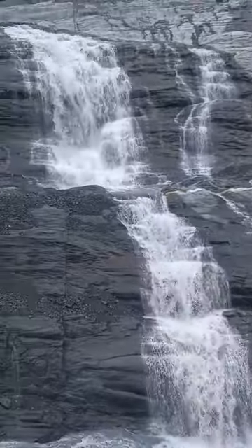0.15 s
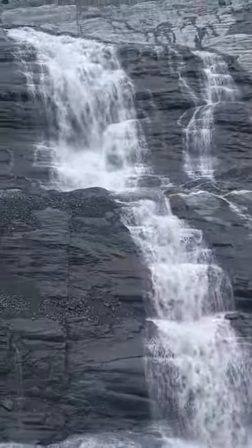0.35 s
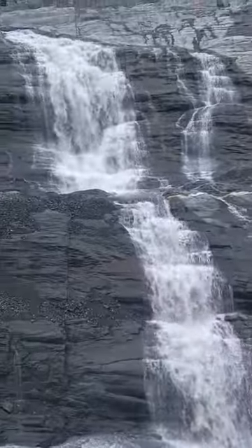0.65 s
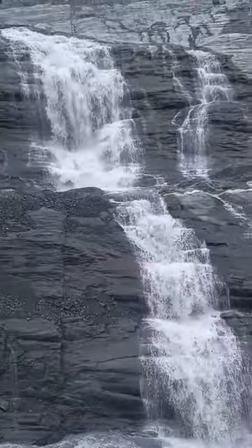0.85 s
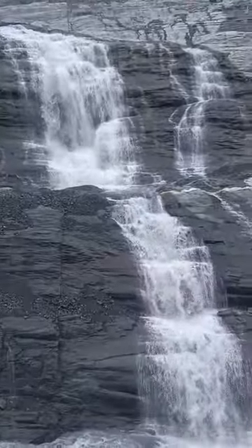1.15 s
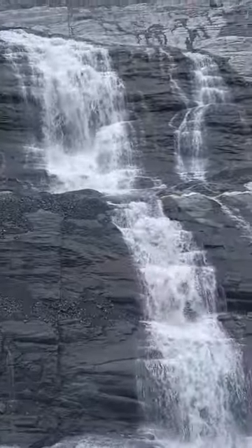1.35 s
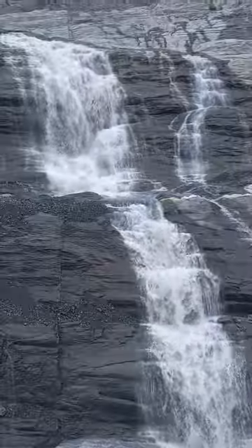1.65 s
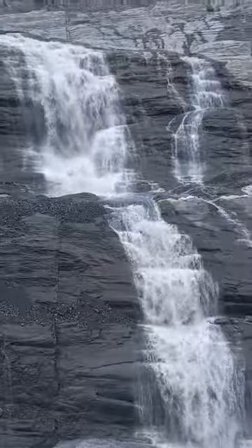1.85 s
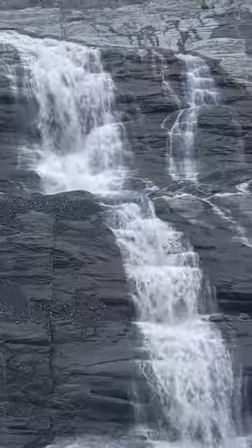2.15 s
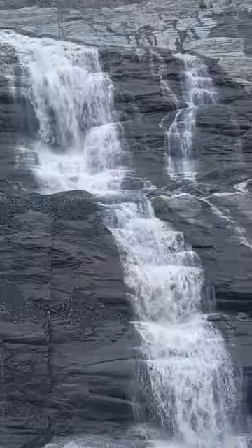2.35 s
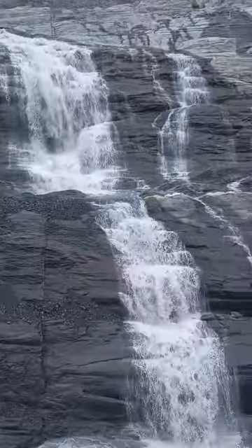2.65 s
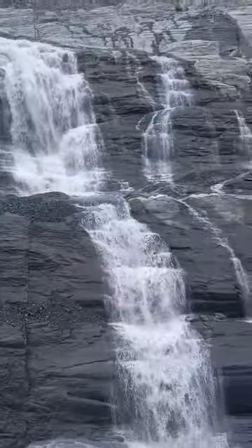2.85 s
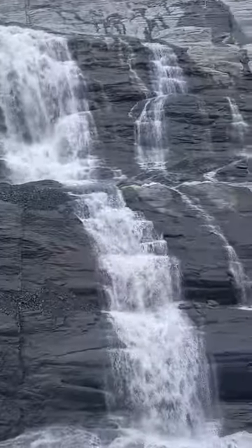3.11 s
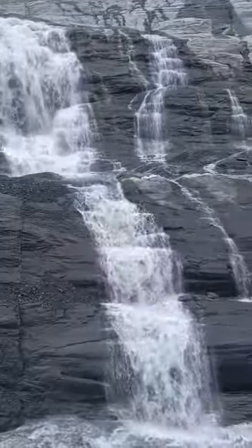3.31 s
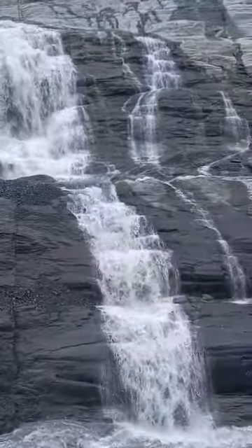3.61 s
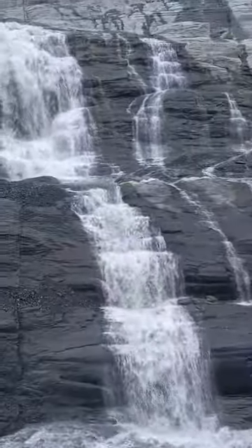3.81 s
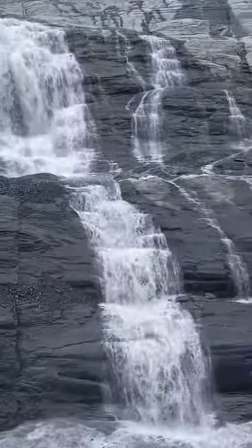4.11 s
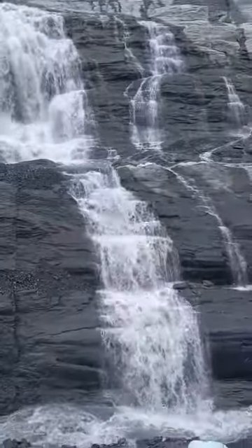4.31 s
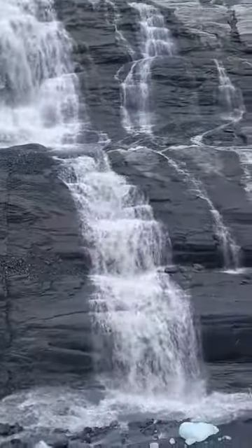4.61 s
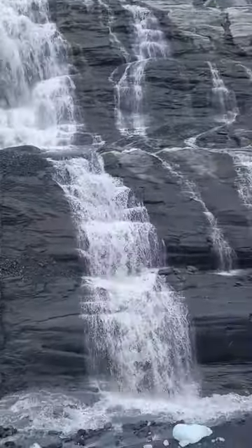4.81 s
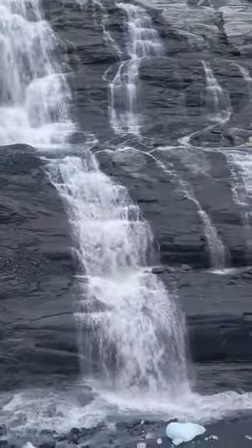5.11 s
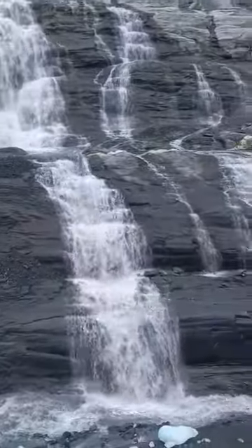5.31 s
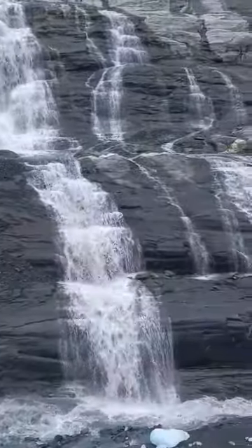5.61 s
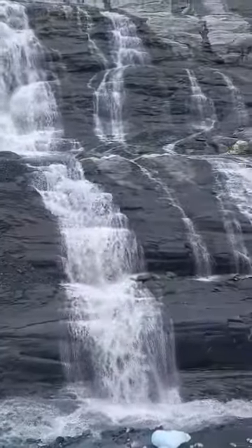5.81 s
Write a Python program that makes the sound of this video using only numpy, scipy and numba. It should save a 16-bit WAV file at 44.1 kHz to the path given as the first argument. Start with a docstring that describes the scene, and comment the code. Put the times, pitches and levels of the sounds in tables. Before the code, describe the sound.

Outdoors in a rocky mountain valley, a cascade of meltwater rushes over stone ledges with dense hiss, slapping drops and bubbling splashes. A hand-held phone catches soft low wind thumps from the start, mostly left. After half a second, ragged crackle and sharp snaps appear, strongest on the right. The rush sags around two and a half seconds, recovers near four, and changes tone as the phone turns.

```python
"""A meltwater cascade pours down rock ledges: spray hisses, drops slap the stone and bubbles ring in the pools.
From the start wind buffets the two microphone ports of a hand-held phone, and the middle band swells briefly.
After half a second the wind also sputters and cracks, most on the right port. The rush dips briefly again and again
and sags midway. Then its colour changes as the phone turns, and a low, hollow double tone sounds near 4.1 s.
Water is filtered noise, random ticks and damped sines; wind is filtered noise and ticks under timed envelopes."""
import sys
import numpy as np
from scipy import signal
from scipy.fft import rfft, irfft
from scipy.io import wavfile
from scipy.ndimage import uniform_filter1d
from numba import njit

SR = 44100
rng = np.random.default_rng(int(sys.argv[2]) if len(sys.argv) > 2 else 0)


def persist_wave(psi):
    """Save psi, clipped to +-1, as 16-bit WAV."""
    counts = np.round(np.clip(psi, -1, 1) * 32767).astype(np.int16)
    wavfile.write(sys.argv[1], SR, np.atleast_2d(counts).T)


N = 262836  # length of the scene [samples]

# colour of wind crackle, shared by the sputter and the cracks: (frequency [Hz], relative level [dB per Hz])
CRACKLE_COLOUR = [(120, -45), (250, -36), (350, -6.5), (550, -2.5), (850, -2.5), (1200, 1.5), (1600, -1.5),
                  (2300, -12.5), (3500, -12.5), (7000, -31)]


def undb(db):
    """Turn decibels into a gain."""
    return 10 ** (np.asarray(db) / 20)


def unit(x):
    """Scale to an average strength (rms) of 1."""
    return x / np.sqrt(np.mean(x ** 2))


def curve(rows):
    """Join (time [s], value) rows by straight lines."""
    return np.interp(np.arange(N) / SR, *np.transpose(rows))


def over_bins(rows):
    """Read (frequency [Hz], value) rows at every frequency bin, on a log axis."""
    hz, value = np.transpose(rows)
    bin_hz = np.maximum(np.fft.rfftfreq(N, 1 / SR), 1)
    return np.interp(np.log(bin_hz), np.log(hz), value)


def colour(x, rows):
    """Filter by (frequency [Hz], gain [dB]) rows."""
    return irfft(rfft(x) * undb(over_bins(rows)), N)


def walk(rate):
    """Wander at random: new levels, rate times a second, smoothed twice and scaled to rms 1."""
    k = max(int(SR / rate), 2)
    held = np.repeat(rng.standard_normal(N // k + 1), k)[:N]
    return unit(uniform_filter1d(uniform_filter1d(held, k), k))


def impacts(per_s, spread_db):
    """Randomly timed ticks of either sign and of uneven strength."""
    hit = rng.random(N) < per_s / SR
    sign = rng.choice([-1, 1], N)
    return unit(hit * sign * undb(spread_db * rng.random(N)))


def pulse(start, length, rise, fall):
    """Envelope 0-1, times in seconds: rise at the start, hold, fall once the length is over."""
    t = np.arange(N) / SR - start
    return np.clip(t / rise, 0, 1) * np.clip(1 - (t - length) / fall, 0, 1)


def steady(x, size):
    """Even out chance swells longer than size samples, keeping roughly the mean level."""
    power = np.mean(np.atleast_2d(x) ** 2, axis=0)
    local_power = uniform_filter1d(power, size) + 1e-18  # never zero
    return x * np.sqrt(power.mean() / local_power)


@njit
def ring(start, hz, cycles, size, glide):
    """Add up damped sines whose pitch climbs, as a bubble's does when it nears the surface."""
    out = np.zeros(N)
    for k in range(len(start)):
        length, phase = int(cycles[k] * SR / hz[k]), 0.
        for i in range(min(length, N - start[k])):
            age = i / length
            phase += 2 * np.pi * hz[k] * (1 + glide * age) / SR
            out[start[k] + i] += size[k] * np.exp(-5 * age) * np.sin(phase)
    return out


def random_rings(count, low_hz, high_hz, cycles, spread_db, glide):
    """Short ringing tones at random times and pitches, like air bubbles of all sizes."""
    when, pitch, life, size = rng.random((count, 4)).T
    start = (when * N).astype(np.int64)
    hz = low_hz * (high_hz / low_hz) ** pitch
    # high-pitched tones are brief but sharp; a few of any pitch are much stronger
    gain = undb(-spread_db * np.log(np.maximum(size, .01))) * hz / low_hz
    return unit(ring(start, hz, cycles * (.5 + life), gain, glide))


def spray(flicker_db, flicker_rate):
    """Sheets of water tear into spray: each third of an octave of the hiss flickers by itself."""
    noise = rfft(rng.standard_normal(N))
    # the lowest and highest bands take in everything beyond 400 and 12000 Hz
    band = np.floor(3 * np.log2(np.clip(np.fft.rfftfreq(N, 1 / SR), 400, 12000)))
    out = 0
    for k in np.unique(band):
        out = out + irfft(noise * (band == k), N) * undb(flicker_db * walk(flicker_rate))
    return unit(out)


def ledge(drops_db=-11, bubbles_db=-8):
    """Water lands on one ledge: spray, with drops slapping the rock and bubbles ringing in the same clumps."""
    drops = impacts(per_s=5000, spread_db=12)
    bubbles = random_rings(count=6000, low_hz=643.4, high_hz=3194, cycles=28.2, spread_db=1.25, glide=0.14)
    clumps = unit(undb(4 * np.tanh(walk(120))))
    splashing = clumps * (undb(drops_db) * drops + undb(bubbles_db) * bubbles)
    return unit(spray(flicker_db=2.5, flicker_rate=110) + splashing)


def at_ports(ledges, rows, lag_ms):
    """One ledge reaches both ports alike, the left a little later; the others reach one port each."""
    shared, left, right = ledges
    rows = np.array(rows)
    alike = over_bins(rows[:, ::2])
    late = np.exp(-2j * np.pi * np.fft.rfftfreq(N, 1 / SR) * lag_ms / 1000)
    together = np.array([shared * late, shared])
    apart = np.array([left, right])
    ports = np.sqrt(alike) * together + np.sqrt(1 - alike) * apart
    return unit(colour(irfft(ports, N), rows[:, :2]))


def steady_flow(rush):
    """The flow is constant, so the splashing and the hiss above it are each evened out."""
    splash = irfft(rfft(rush) * (np.fft.rfftfreq(N, 1 / SR) < 2800), N)
    return steady(splash, size=1700) + steady(rush - splash, size=1700)


def rush_level():
    """Level in dB: a slow curve that sags midway, with brief dips cut into it and a slight random flutter."""
    # slow course of the rush, before the overall level is added: (time [s], level [dB])
    slow_course = [(0, -24), (0.25, -23), (0.6, -26.5), (0.86, -24), (1.24, -23.5), (1.4, -25), (1.56, -23),
                   (2.0, -32), (2.45, -35.5), (2.82, -32), (2.96, -28.5), (3.3, -28), (3.65, -26),
                   (3.85, -23.5), (4.55, -23.5), (4.9, -24.5), (5.4, -23), (5.96, -24)]
    # the rush dips briefly on both ports: (start [s], length [s], depth [dB])
    brief_dips = [(0.369, 0.056, 2.5), (0.496, .14, 5), (0.751, 0.081, 4), (0.996, 0.079, 2.5),
                  (1.06, 0.05, 4), (1.273, 0.056, 1), (1.594, 0.092, 2.5), (1.708, 0.054, 4.5),
                  (1.81, 0.028, 3.5), (1.91, 0.06, 2.5), (2.248, 0.017, 2), (2.677, 0.015, 2),
                  (2.386, 0.044, 4.5), (2.747, 0.13, 3.5), (2.998, 0.11, 2), (3.176, 0.071, 1.5),
                  (3.371, 0.024, 4), (3.483, 0.049, 3.5), (3.961, 0.098, 2.5), (4.086, 0.059, 6),
                  (4.228, 0.021, 1.5), (4.4, 0.08, 2.5), (4.698, 0.031, 4.5), (4.817, 0.023, 3.5),
                  (4.979, 0.02, 1.5), (5.11, 0.015, 0.5), (5.578, 0.015, 1), (5.88, 0.059, 3.5)]
    dips = sum(depth * pulse(s, length, rise=0.007, fall=0.028) for s, length, depth in brief_dips)
    flutter = 0.55 * walk(120)  # small quick unevenness
    return curve(slow_course) - dips + flutter


def waterfall(level_db=4.5, right_db=.5, lag_ms=0.074, mist_db_per_db=0.1):
    """The cascade from three ledges, blending between two colours as the phone turns."""
    # colour before and after the turn: (frequency [Hz], relative level [dB per Hz], likeness at the ports [0-1])
    falls_before = [(120, -58, .8), (210, -11, 0.5), (296, -10, 1), (427, -15.5, 0.92), (572, -2.5, 0.77),
                    (724, -7.5, 1), (1040, -3, 0.28), (1164, -1.5, 0.07), (1370, 2, 0.77), (1600, -2, 0.52),
                    (1930, 0.5, 0.5), (2090, -0.5, 0.55), (3070, -7.5, 0.43), (3770, -4, 0.75),
                    (6200, -4.5, 0)]
    falls_after = [(120, -21, 1), (220, -8, 0.73), (367, -5.5, 1), (474, -10, 0.71), (924, -8.5, 0.85),
                   (1060, -2, 1), (1186, -2.2, 0.37), (1280, -12, 0.17), (1490, -1.5, 0.17),
                   (1710, 0.5, 0.65), (1940, -0.5, 0.99), (2300, -7, 0.26), (2470, -3, 0.58),
                   (2580, -7.5, 0.24), (2850, -7, 0.31), (4020, -1, 0.34), (4850, -5, 0.2),
                   (5870, -3, 0.08)]
    # how far the phone has turned: (time [s], share of the turn [0-1])
    turn_course = [(0, 0.08), (3.0, 0.07), (4.0, 0.57), (4.7, 0.93), (5.2, 0.8), (5.96, 0.7)]
    ledges = [rfft(ledge()) for _ in range(3)]
    turn = curve(turn_course)
    before = at_ports(ledges, falls_before, lag_ms)
    after = at_ports(ledges, falls_after, lag_ms)
    rush = steady_flow((1 - turn) * before + turn * after)
    # the finest hiss sinks further than the rest whenever the rush dips
    rush_db = rush_level()
    mist = irfft(rfft(rush) * (np.fft.rfftfreq(N, 1 / SR) > 8000), N)
    rush = rush + mist * (undb(mist_db_per_db * (rush_db - rush_db.mean())) - 1)
    return rush * undb(rush_db + level_db + np.array([[0], [right_db]]))


def buffet(port, breeze_db, gust_db, flutter_db):
    """Wind thumps on one port: gusts come at the same times on both, with separate noise and levels."""
    # colour of the thumping air: (frequency [Hz], relative level [dB per Hz])
    rumble = [(20, -22), (45, -28), (65, -9), (87, 1), (115, -4), (150, -5.5), (200, -14), (300, -12.5),
              (500, -27), (1200, -19), (3000, -70)]
    # gusts, before gust_db is added: (start [s], length [s], left port level [dB], right port level [dB])
    gust_times = [(0, .11, -30.5, -43), (0.162, 0.035, -30, -27), (0.31, 0.035, -24.5, -24),
                  (0.366, 0.027, -26.5, -24), (0.421, 0.035, -23.5, -27), (0.471, 0.034, -30, -24),
                  (0.66, 0.058, -30.5, -44), (0.735, 0.024, -26, -45), (0.865, .075, -32, -30.5),
                  (0.923, 0.093, -42, -30), (1, 0.1, -29, -49), (1.13, .04, -40, -33),
                  (1.195, 0.067, -27, -26), (1.286, 0.03, -23, -26), (1.335, 0.051, -23.5, -25),
                  (1.389, 0.036, -29, -25), (1.435, 0.16, -31, -38), (1.614, 0.1, -32, -53),
                  (1.769, 0.078, -26, -43), (1.857, 0.057, -27.5, -36), (2.292, .025, -32, -57),
                  (2.98, 0.033, -28.5, -46), (3.11, 0.065, -33, -59), (3.25, .035, -31, -58),
                  (3.323, .035, -32, -51), (3.419, 0.03, -25, -52), (3.55, 0.033, -26.5, -50.5),
                  (3.645, 0.033, -23, -35), (3.755, .05, -28, -40), (3.833, 0.036, -21.5, -22.5),
                  (3.897, 0.043, -29, -33), (3.956, 0.03, -20.5, -20.5), (4.057, 0.055, -25.5, -32),
                  (4.115, .035, -27, -43), (4.174, 0.063, -30, -28), (4.274, 0.044, -20.5, -21.5),
                  (4.403, 0.045, -21, -20), (4.48, 0.063, -26.5, -26), (4.545, 0.15, -32, -28),
                  (4.761, 0.062, -24.5, -30), (4.86, 0.1, -30, -33), (5.015, 0.046, -26, -23),
                  (5.08, 0.02, -33, -26), (5.126, 0.028, -29, -24), (5.19, 0.03, -25.5, -26),
                  (5.23, 0.093, -40, -29.5), (5.394, 0.026, -27, -28), (5.585, 0.025, -26, -26),
                  (5.626, 0.04, -25, -22), (5.709, 0.055, -29.5, -28), (5.862, 0.026, -26, -24),
                  (5.935, 0.025, -29, -41)]
    # light breeze under the gusts, before breeze_db is added: (time [s], level [dB])
    breeze = [(0, -42), (0.56, -41.5), (0.95, -40), (1.7, -42), (2.33, -43.5), (2.42, -53), (2.65, -44),
              (2.78, -51), (3.05, -43), (3.5, -41.5), (4.6, -37), (5.96, -44)]
    air = steady(colour(rng.standard_normal(N), rumble), size=1500)  # the gusts set the force
    air = unit(air * undb(flutter_db * walk(45)))
    gust_power = sum((undb(db[port] + gust_db) * pulse(s, length, rise=0.012, fall=0.015)) ** 2
                     for s, length, *db in gust_times)
    breeze_power = undb(curve(breeze) + breeze_db) ** 2
    return air * np.sqrt(gust_power + breeze_power)


def burst(source, start, length, low_hz, high_hz):
    """A short swell of one band of the source, scaled to rms 1 before its edges are shaped."""
    rise, fall = 0.013, 0.019  # seconds
    out = np.zeros_like(source)
    span = slice(int(start * SR), int((start + length + fall) * SR))
    band = signal.butter(2, [low_hz, high_hz], "bandpass", fs=SR, output="sos")
    swell = unit(signal.sosfilt(band, source[..., span]))
    out[..., span] = swell * pulse(start, length, rise, fall)[span]
    return out


def middle_swells(apart_db=-5, lag_ms=0.073):
    """Brief swells of the middle band: coarse clusters of short ringing tones, some stronger on the right."""
    # swells: (start [s], length [s], low edge [Hz], high edge [Hz], level [dB], right over left [dB])
    swell_times = [(0.005, 0.12, 1210, 2400, -31.5, 0), (0.14, 0.075, 1210, 2300, -28, 1),
                   (0.258, 0.11, 1140, 1900, -31, -0.5), (0.82, 0.12, 1200, 2300, -28, 1),
                   (1.2, 0.09, 1250, 2300, -29, 1), (1.386, 0.034, 1250, 2220, -26.5, 2),
                   (1.5, 0.09, 1200, 2180, -35, 1), (1.601, 0.13, 1210, 2200, -31, 2),
                   (2.287, 0.09, 1150, 2300, -34, 4), (2.6, 0.064, 890, 2100, -32.5, 5),
                   (2.705, 0.04, 1100, 2220, -33, 5), (2.895, 0.058, 1110, 2200, -34.5, -2),
                   (3.253, 0.12, 990, 2160, -31, -2), (3.572, 0.044, 600, 950, -32.5, 5),
                   (3.583, 0.047, 1300, 2200, -31, -1), (3.75, 0.055, 1400, 2200, -30.5, 1),
                   (3.825, 0.06, 1380, 2300, -29, 0), (4.333, 0.045, 1370, 2300, -30, -2),
                   (4.497, 0.041, 1480, 2200, -32, 0), (4.57, 0.075, 1450, 2200, -29.5, 0),
                   (4.739, 0.055, 1540, 2100, -28.5, 0), (4.853, 0.042, 1600, 2080, -27.5, 1),
                   (4.942, 0.035, 1010, 1180, -33, 0), (5.025, 0.04, 1600, 2070, -26.5, 1),
                   (5.297, 0.1, 1550, 2070, -30.5, 0), (5.27, 0.33, 1024, 1180, -33.5, -2),
                   (5.515, 0.06, 1550, 2050, -29.5, -2), (5.7, 0.061, 1030, 1200, -34, -3),
                   (5.763, 0.11, 1650, 2480, -31.5, 0)]
    shared, left, right = (random_rings(count=5000, low_hz=550, high_hz=2900, cycles=16, spread_db=2, glide=0.15)
                           for _ in range(3))
    together = np.array([np.roll(shared, int(lag_ms * SR / 1000)), shared])  # the left a little later
    tones = together + undb(apart_db) * np.array([left, right])
    out = 0
    for s, length, low, high, db, pan in swell_times:
        port_db = db + np.array([[-pan], [pan]]) / 2
        out = out + burst(tones, s, length, low, high) * undb(port_db)
    return out


def sputter(level_db):
    """Air tearing across a port breaks into spells of ragged crackle."""
    # spells of crackle, before level_db is added: (start [s], length [s], level [dB])
    spell_times = [(0.53, 0.3, -29.5), (1.04, 0.05, -26.5), (1.613, 0.15, -28.5), (1.78, 0.052, -27),
                   (1.857, 0.05, -24), (1.93, 0.24, -28.5), (2.197, 0.07, -30), (2.286, 0.13, -28.5),
                   (2.425, 0.171, -28.5), (2.593, 0.2, -29), (2.817, 0.032, -27.5), (2.878, 0.31, -27.5),
                   (3.248, 0.5, -27), (3.782, 0.98, -30.5)]
    ticks = impacts(per_s=900, spread_db=8)
    chop_db = 4.5 * np.tanh(walk(220))
    crackle = unit(colour(ticks, CRACKLE_COLOUR) * undb(chop_db))
    spells = sum(undb(db) * pulse(s, length, rise=0.0037, fall=0.0037) for s, length, db in spell_times)
    return crackle * spells * undb(level_db)


def cracks(level_db):
    """Single sharp snaps of wind stand out of the crackle, with the same colour."""
    # snaps, before level_db is added: (time [s], peak level [dB])
    snaps = [(0.621, -9), (1.077, -13), (1.093, -9.5), (1.725, -10), (1.831, -6), (1.909, -9),
             (1.983, -8.5), (2.212, -8.5), (2.257, -12), (2.495, -14), (2.539, -9.5), (2.661, -18),
             (2.676, -20), (2.731, -15), (2.745, -23), (3.033, -11), (3.112, -14), (3.186, -6.5),
             (3.498, -10)]
    ticks = np.zeros(N)
    for s, db in snaps:
        ticks[int(s * SR)] = undb(db + level_db)
    # a single tick's peak equals the mean gain of the filter, so divide by that
    return colour(ticks, CRACKLE_COLOUR) / undb(over_bins(CRACKLE_COLOUR)).mean()


def knocks():
    """The smallest eddies strike both ports as hollow knocks, higher than the rumble: short bands of noise."""
    # knocks: (time [s], middle pitch [Hz], level [dB])
    knock_times = [(0.69, 232, -43), (1.29, 220, -43), (1.356, 250, -36), (1.805, 233, -35.5),
                   (2.325, 258, -44), (2.55, 270, -49), (2.99, 240, -41), (3.425, 220, -42),
                   (3.89, 192, -37.5), (3.96, 290, -40), (4.065, 220, -44), (4.79, 260, -37),
                   (5.87, 248, -34)]
    width = 0.44  # half width as a share of the pitch
    air = rng.standard_normal(N)
    return sum(burst(air, s, 0.018, hz * (1 - width), hz * (1 + width)) * undb(db)
               for s, hz, db in knock_times)


def hollow_double_tone(glide=0.11):
    """A brief low, hollow double tone near 4.1 s: two damped sines whose pitch climbs."""
    # tones: (time [s], starting pitch [Hz], length [cycles of that pitch], starting level [dB])
    tones = [(4.088, 508, 30, -26), (4.114, 577, 31, -25.5)]
    s, hz, cycles, db = np.array(tones, float).T.copy()
    return ring((s * SR).astype(np.int64), hz, cycles, undb(db), glide)


def scene():
    """The falls, with wind on each port: the left takes more of the breeze, the right more of the crackle."""
    left = buffet(0, breeze_db=0.0, gust_db=-5.5, flutter_db=1.5) + sputter(level_db=-12.5)
    right = buffet(1, breeze_db=-22, gust_db=-6.5, flutter_db=1) + sputter(level_db=-3) + cracks(level_db=1.0)
    return waterfall() + np.array([left, right]) + middle_swells() + knocks() + hollow_double_tone()


def record(dry):
    """Overall tone: a narrow notch near 1800 Hz, steeply duller treble above 7000 Hz, nothing above 15200 Hz."""
    # overall tone: (frequency [Hz], gain [dB])
    overall_tone = [(1760, 3.5), (1808, -5.5), (1860, 3.5), (6000, 6.5), (6650, 7.5), (7050, -3.5),
                    (7500, -27), (8300, -39), (9300, -15.5), (12000, -21), (15000, -22.5)]
    top_cut = signal.ellip(10, .2, 80, 15200, fs=SR, output="sos")
    return signal.sosfilt(top_cut, colour(dry, overall_tone))


dry = scene()
out = record(dry)
persist_wave(out)
```